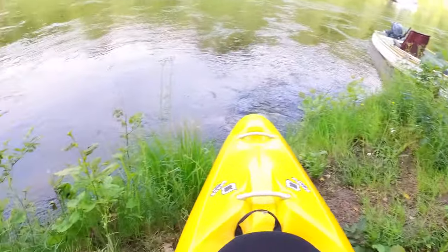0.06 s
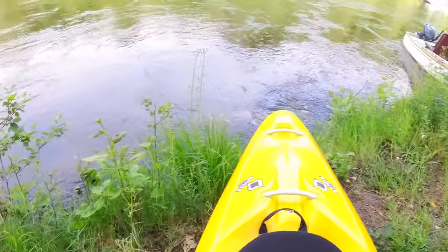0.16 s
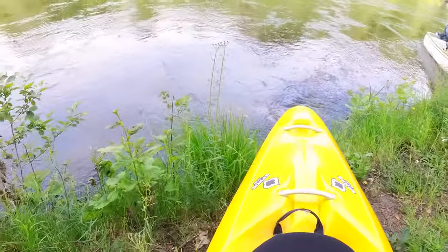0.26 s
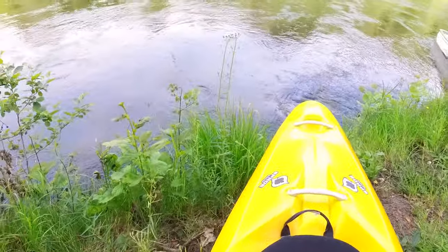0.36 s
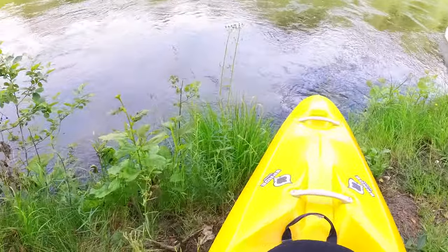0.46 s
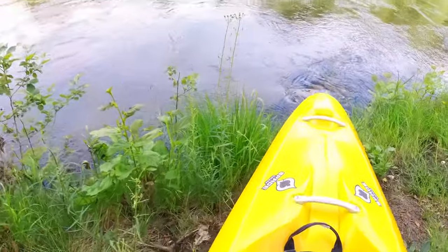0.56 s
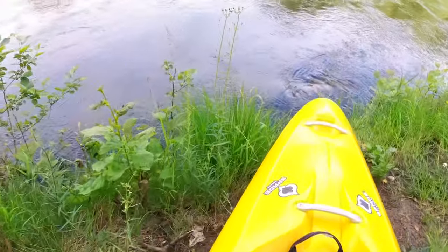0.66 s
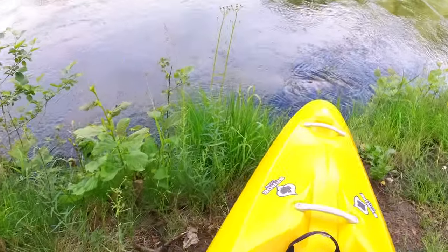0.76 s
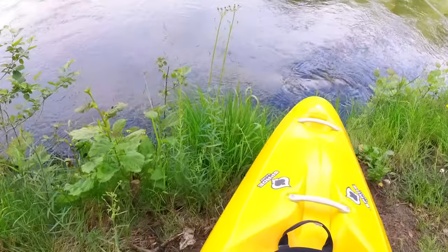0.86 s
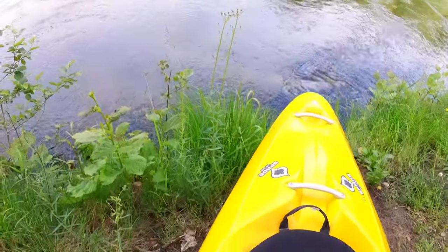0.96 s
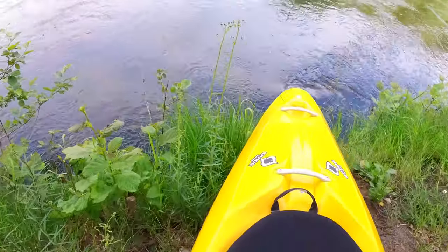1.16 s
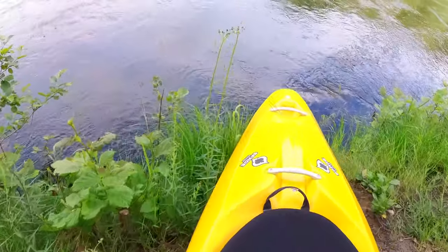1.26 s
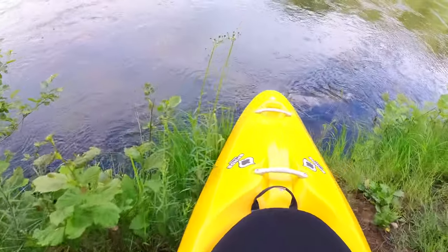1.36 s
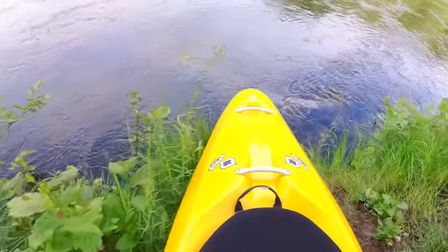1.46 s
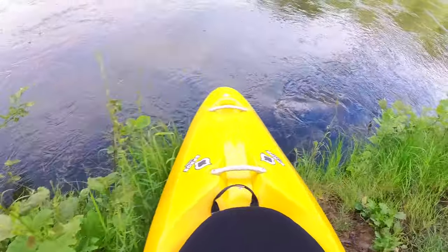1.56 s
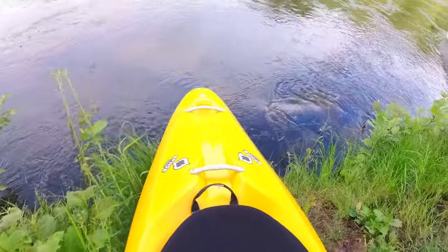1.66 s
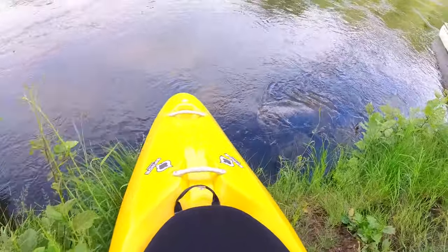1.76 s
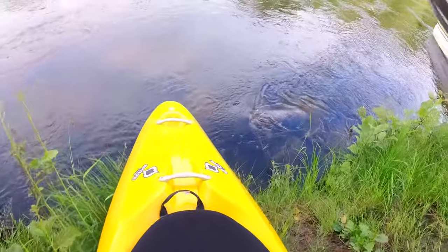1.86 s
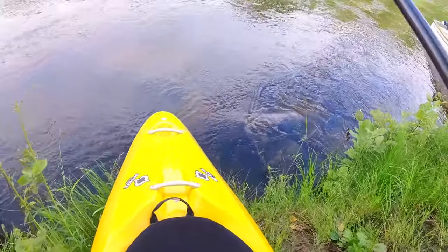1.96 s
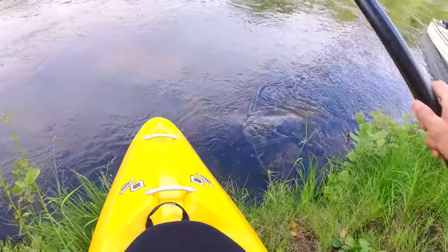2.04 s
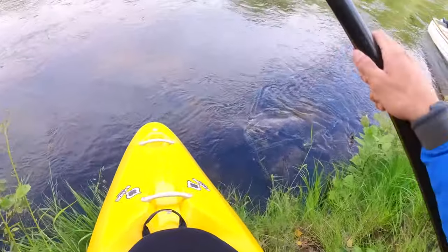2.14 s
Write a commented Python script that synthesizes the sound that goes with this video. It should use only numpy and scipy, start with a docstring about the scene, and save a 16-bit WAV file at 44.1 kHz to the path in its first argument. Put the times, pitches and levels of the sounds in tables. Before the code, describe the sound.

Booming thumps of an empty plastic kayak shoved down a bank, with grass swishes and quiet water

```python
"""A hollow plastic kayak is shoved down a grassy bank, heard from the seat: knocks excite hull modes that ring
and decay, with noise bursts for the clatter and the crack.
Grass swishes and flicks along the hull and the keel grinds once on soil, all as swelling grainy noise.
The river ahead rushes and hisses as coloured noise and laps in rising bubbles.
Puffs of air buffet the stereo microphone near the end; its left port is muffled in the treble."""
import sys
import numpy as np
from scipy import signal
from scipy.fft import rfft, irfft, next_fast_len
from scipy.io import wavfile
from scipy.ndimage import uniform_filter1d, minimum_filter1d, map_coordinates

SR = 44100
rng = np.random.default_rng(int(sys.argv[2]) if len(sys.argv) > 2 else 0)


def to_wav(sig):
    """Store sig (one row per channel, or 1-D mono) as 16-bit WAV at the path in sys.argv[1].

    Samples outside -1..1 are clipped; the rate is SR.
    """
    pcm = np.clip(np.atleast_2d(sig), -1, 1) * 32767
    pcm = np.round(pcm).astype(np.int16)
    wavfile.write(sys.argv[1], SR, pcm.T)  # frames by channels


N = 94815  # samples


def amp(db):
    """Decibels to gain."""
    return 10 ** (np.asarray(db) / 20)


def unit(x):
    """Scale to rms 1."""
    return x / np.sqrt(np.mean(x ** 2) + 1e-20)


def along(points, hz):
    """Read (frequency_hz, value) points on a log frequency axis."""
    point_hz, value = np.transpose(points)
    return np.interp(np.log(hz + 1), np.log(point_hz + 1), value)


def curve(rows):
    """Join (time_s, value) points into one value per sample."""
    return np.interp(np.arange(N) / SR, *np.transpose(rows))


def since(start_s):
    """Seconds since start_s, zero before it."""
    return np.maximum(np.arange(N) / SR - start_s, 0)


def strike(t, rise_s, t60_s):
    """A struck body's envelope: quick rise, then exponential decay of 60 dB in t60_s."""
    return (1 - np.exp(-t / rise_s)) * amp(-60 * t / t60_s)


def swells(rows):
    """Bell-shaped swells from (centre_s, length_s, level_db) rows, added in power."""
    t = np.arange(N) / SR
    power = 0
    for centre_s, length_s, level_db in rows:
        power = power + amp(level_db) ** 2 * np.exp(-((t - centre_s) / length_s) ** 2)
    return np.sqrt(power)


def wobble(knots_per_s):
    """Random knots joined by straight lines."""
    return map_coordinates(rng.standard_normal(N), [np.arange(N) * knots_per_s / SR], order=1)


def filtered(x, response):
    """Multiply the spectrum of x by a response of frequency."""
    size = next_fast_len(N + SR // 4)
    hz = np.fft.rfftfreq(size, 1 / SR)
    return irfft(rfft(x, size) * response(hz), size)[..., :N]


# How alike the two microphone ports hear a spread-out sound: frequency_hz, likeness (1 is identical)
PORT_LIKENESS = [(30, 0.73), (100, 0.94), (250, 0.99), (500, 1), (1000, 1), (2000, 0.73), (4000, 0.19),
                 (8000, 0.13)]
GRAINS_PER_S = 650


def noise(spectrum, alike=PORT_LIKENESS, grain_db=0):
    """Coloured stereo noise of rms 1, its level jittered in fine grains by grain_db."""
    def mid_side_response(hz):
        turn = np.arccos(np.clip(along(alike, hz), -1, 1)) / 2
        return amp(along(spectrum, hz)) * [np.cos(turn), np.sin(turn)]

    grainy = rng.standard_normal((2, N)) * amp(grain_db * wobble(GRAINS_PER_S))
    mid, side = filtered(grainy, mid_side_response)
    return unit(np.array([mid + side, mid - side]))


# Tone of the current ahead: frequency_hz, relative_db
RIVER_COLOUR = [(20, -14.5), (45, -4.5), (85, 2), (130, 0), (180, 0.5), (250, -4), (370, -6), (500, -5),
                (680, -7), (780, -0.5), (900, -1.5), (1100, -4.5), (1600, -10.5), (2200, -16),
                (3200, -19.5), (4500, -39), (7000, -72.5)]
# Slow level of the current, before the trim below: time_s, relative_db
RIVER_LEVEL_CURVE = [(0.0, -43), (0.66, -43.5), (1.06, -42.5), (2.15, -42)]
# Tone of the faint hiss over the current: frequency_hz, relative_db
HISS_COLOUR = [(1500, -17.5), (3000, 2), (4500, 3.5), (6000, -1), (7400, -11.5), (8500, -20), (9500, -43.5)]
RIVER_TRIM_DB, HISS_DB = 4.5, -57


def river():
    """Turbulent water ahead: broad rushing noise, slightly unsteady, with a faint hiss on top."""
    unsteady_db = 0.32 * wobble(13.51)
    rush = amp(curve(RIVER_LEVEL_CURVE) + RIVER_TRIM_DB + unsteady_db) * noise(RIVER_COLOUR)
    return rush + amp(HISS_DB) * noise(HISS_COLOUR)


# Level of the lapping at the water's edge: time_s, level_db
LAPPING_LEVEL = [(0, -53), (.9, -68.5), (1.1, -45.5), (1.35, -44), (1.6, -47), (1.75, -51), (2.15, -51.5)]
LAP_HZ, LAP_SPREAD = 402.4, 0.22  # middle pitch and its spread (natural log)
LAP_CYCLES, LAP_GLIDE = 31, 0.19  # cycles to fall 60 dB; phase gained over them, as a fraction


def lapping(count=260):
    """Small low bubbles at the water's edge ring as they decay, each rising in pitch."""
    t = np.arange(SR // 10) / SR
    start = rng.integers(0, N, (count, 1))
    pitch, size = rng.standard_normal((2, count, 1))
    hz = LAP_HZ * np.exp(LAP_SPREAD * pitch)
    age = hz * t / LAP_CYCLES
    envelope = amp(2 * size - 60 * age) * (1 - np.exp(-hz * t))
    bubbles = envelope * np.sin(2 * np.pi * hz * t * (1 + LAP_GLIDE * age))
    positions = start + np.arange(len(t))
    water = np.bincount(positions.ravel(), bubbles.ravel(), N)[:N]
    return amp(curve(LAPPING_LEVEL)) * unit(water)


BEND_DELAY_S, BEND_HZ = 0.002, 100  # a mode at BEND_HZ arrives this late, higher ones sooner
PORT_SPREAD_HZ = 2400  # here the ports differ by one radian at full lean


def mode(start_s, hz, t60_s, rise_s, lean=1):
    """One bending mode, cut off after a quarter second; port phases differ more with pitch and lean."""
    start = int(start_s * SR)
    stop = min(start + SR // 4, N)
    arrival_s = start_s + BEND_DELAY_S * np.sqrt(BEND_HZ / hz)
    t = np.maximum(np.arange(start, stop) / SR - arrival_s, 0)
    phase = lean * np.array([[-0.5], [0.5]]) * hz / PORT_SPREAD_HZ
    ring = strike(t, rise_s, t60_s) * np.sin(2 * np.pi * hz * t + phase)
    return np.pad(ring, ((0, 0), (start, N - stop)))


# Blows on the hull: start_s, ring_db, ring_tilt_db_per_octave, panel_hz, panel_db,
# overtone_hz, overtone_db, clatter_db, crack_db, crack_tilt_db_per_octave
HULL_KNOCKS = [(0.1756, -12, -1, 92, -6, 229, -8, -18.5, -17.5, -6),
               (0.199, -23, -0.5, 105, -26, 339.7, -23.5, -29, -37, 6),
               (0.241, -42, -10, 81, -21.5, 186, -30.5, -50, -54, -2),
               (.951, -26.5, -5, 134, -26.5, 325, -30.5, -49, -67, -2),
               (0.981, -50, 5, 80.3, -21.5, 174, -37, -40, -59, -5),
               (1.7322, -14.5, -1.5, 113.7, -7.5, 278.2, -16, -22, -23, 12),
               (1.8146, -12, -0.5, 157, -7, 298, -20.5, -14.5, -19.5, 0)]
# Ringing modes of the whole hull: frequency_hz, relative_db, t60_s
HULL_MODES = [(102.4, -8, 0.16), (133, 1.5, 0.12), (175, -7, 0.11), (232.4, -6.5, 0.13), (269, -9, 0.19),
              (344, 2, 0.08), (410, -19.5, 0.24), (488, -14, 0.067), (579, -9, 0.1), (657, -10, 0.034),
              (758, -12.5, 0.12), (851, -12, 0.16), (962, -3.5, 0.061), (1145, -22, 0.047),
              (1454, -19.5, 0.083), (2110, -43, 0.02), (2280, -27.5, 0.069)]
# Tone of the dense upper modes: frequency_hz, relative_db
CLATTER_COLOUR = [(60, -31.5), (150, -17), (330, -14), (480, -4.5), (900, -8.5), (1400, -9), (2200, -14),
                  (3200, -25.5), (5000, -41), (9000, -80.5)]
# Tone of the contact itself, before each blow's tilt: frequency_hz, relative_db
CRACK_COLOUR = [(300, -28.5), (1200, -13.5), (2000, 0.5), (3400, -1), (4600, -4.5), (6000, -5.5),
                (7300, -20.5), (9000, -55.5), (12000, -60.5), (16000, -62)]
TILT_HZ = 322  # both tilts pivot here
PANEL_T60_S, PANEL_RISE_S = 0.14, 0.0051
OVERTONE_T60_S, OVERTONE_RISE_S = 0.18, 0.002
RISE_CYCLES = 0.17  # rise of each hull mode
CLATTER_T60_S, CLATTER_RISE_S = 0.064, 0.00067
CRACK_T60_S, CRACK_RISE_S = 0.035, 0.00015
AFTER_DB, AFTER_T60_S = -15, 0.1  # the hollow inside keeps ringing, relative to the clatter


def knocks():
    """Each blow cracks, clatters through the dense upper modes, and booms in the struck panel and whole hull."""
    boom, clatter, crack = np.zeros((3, 2, N))
    for (start_s, ring_db, ring_tilt_db, panel_hz, panel_db, overtone_hz, overtone_db,
         clatter_db, crack_db, crack_tilt_db) in HULL_KNOCKS:
        boom += amp(panel_db) * mode(start_s, panel_hz, PANEL_T60_S, PANEL_RISE_S)
        boom += amp(overtone_db) * mode(start_s, overtone_hz, OVERTONE_T60_S, OVERTONE_RISE_S)
        for k, (hz, mode_db, t60_s) in enumerate(HULL_MODES):
            tilt_db = ring_tilt_db * np.log2(hz / TILT_HZ)
            level_db = ring_db + mode_db + tilt_db + rng.normal(0, 1)
            lean = 2 * rng.random() - 1
            sign = (-1) ** k
            boom += sign * amp(level_db) * mode(start_s, hz, t60_s, RISE_CYCLES / hz, lean)
        t = since(start_s)
        after = amp(AFTER_DB) * strike(t, CLATTER_RISE_S, AFTER_T60_S)
        clatter += amp(clatter_db) * (strike(t, CLATTER_RISE_S, CLATTER_T60_S) + after)
        colour = [(hz, db + crack_tilt_db * np.log2(hz / TILT_HZ)) for hz, db in CRACK_COLOUR]
        crack += amp(crack_db) * strike(t, CRACK_RISE_S, CRACK_T60_S) * noise(colour)
    return boom + clatter * noise(CLATTER_COLOUR) + crack


# Single stalks flicking the plastic, before the left-port gain: start_s, relative_db
STALK_FLICKS = [(0.236, -30.5), (0.245, -38), (0.779, -38), (1.076, -31), (1.275, -28.5), (1.294, -30),
                (1.833, -30)]
# Grass brushing the hull, before the left-port gain: centre_s, length_s, relative_db
GRASS_SWISHES = [(.243, 0.036, -48.5), (.31, .05, -60), (.44, 0.027, -57.5), (.68, .05, -50.5),
                 (.98, 0.056, -50), (1.085, 0.028, -45), (1.26, 0.13, -49), (1.3, 0.033, -49),
                 (1.62, .1, -52), (1.77, 0.062, -50), (1.855, 0.047, -49), (2.14, 0.082, -52.5)]
# Tone of the grass: frequency_hz, relative_db
GRASS_COLOUR = [(500, -28), (1500, -15.5), (3000, -1.5), (4200, 3.5), (6200, -0.5), (7400, -8), (8500, -22),
                (9500, -36), (12000, -66)]
# Gain of the grass at the left port as the bow swings into it: time_s, gain_db
GRASS_LEFT_GAIN = [(0, -6), (1.5, 2), (1.75, 6), (2.15, 7.5)]
# The keel grinding on soil: centre_s, length_s, level_db
KEEL_SCRAPES = [(.251, 0.0078, -32.5)]
# Tone of the soil: frequency_hz, relative_db
SOIL_COLOUR = [(100, -2), (500, 1), (1200, -7), (1650, -0.5), (2100, -8), (3000, -7.5), (6000, -18),
               (9000, -65.5)]
FLICK_RISE_S, FLICK_T60_S = 0.0005, 0.02
GRAIN_DB = 2.5


def bank():
    """Friction along the hull: grass brushes and flicks it and the keel grinds on soil, in fine grains."""
    flicks = sum(amp(db) * strike(since(s), FLICK_RISE_S, FLICK_T60_S) for s, db in STALK_FLICKS)
    grass = np.hypot(swells(GRASS_SWISHES), flicks) * noise(GRASS_COLOUR, grain_db=GRAIN_DB)
    left_only = [[1], [0]]
    panned_grass = grass * amp(curve(GRASS_LEFT_GAIN) * left_only)
    soil = swells(KEEL_SCRAPES) * noise(SOIL_COLOUR, grain_db=GRAIN_DB)
    return panned_grass + soil


# Air on the microphone, before the left-right balance: centre_s, length_s, relative_db
AIR_PUFFS = [(1.882, 0.016, -29.5), (1.907, 0.01, -26.5), (1.95, 0.088, -42)]
# Tone of the buffet: frequency_hz, relative_db
WIND_COLOUR = [(20, 2), (50, 13), (100, 8), (170, 1), (300, -29), (800, -72)]
WIND_PAN_DB = 1.5  # left raised and right lowered by this much


def wind():
    """Short low buffets as air strikes the microphone, almost unrelated at its two ports."""
    buffet = noise(WIND_COLOUR, alike=[(100, 0.012)])
    return swells(AIR_PUFFS) * buffet * amp([[WIND_PAN_DB], [-WIND_PAN_DB]])


def scene():
    """River, hull, bank and air together at the seat."""
    return river() + lapping() + knocks() + bank() + wind()


LIMIT_DB, LOOK_AHEAD_S = -3, 0.003


def limit(x):
    """A fast look-ahead limiter, shared by both ports, holds the hardest knocks under the ceiling."""
    size = int(LOOK_AHEAD_S * SR)
    gain = np.minimum(1, amp(LIMIT_DB) / (np.abs(x).max(0) + 1e-9))
    return x * uniform_filter1d(minimum_filter1d(gain, 2 * size), size)


# Muffling of the left microphone port: frequency_hz, gain_db
LEFT_PORT_RESPONSE = [(1000, 0), (2700, 2.5), (3500, 1.5), (4300, -22.5), (5000, -14.5), (5600, -8.5),
                      (6500, -23), (7400, -26), (8100, -15.5)]
LEFT_LAG_S = 0.000135
LOW_CUT_HZ, TOP_HZ = 26.3, 15900


def record(dry):
    """The left port hears later and duller; the recorder cuts deep bass, limits peaks and ends at its band limit."""
    def left_response(hz):
        lag = np.exp(-2j * np.pi * hz * LEFT_LAG_S)
        return amp(along(LEFT_PORT_RESPONSE, hz)) * lag

    ports = np.array([filtered(dry[0], left_response), dry[1]])
    low_cut = signal.butter(2, LOW_CUT_HZ, 'highpass', fs=SR, output='sos')
    limited = limit(signal.sosfilt(low_cut, ports))
    return filtered(limited, lambda hz: hz < TOP_HZ)


dry = scene()
out = record(dry)
to_wav(out)
```